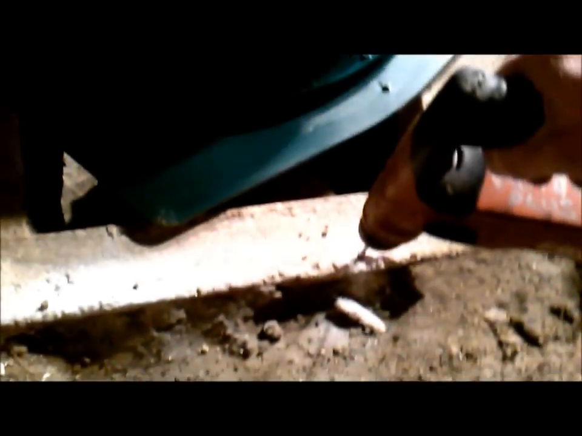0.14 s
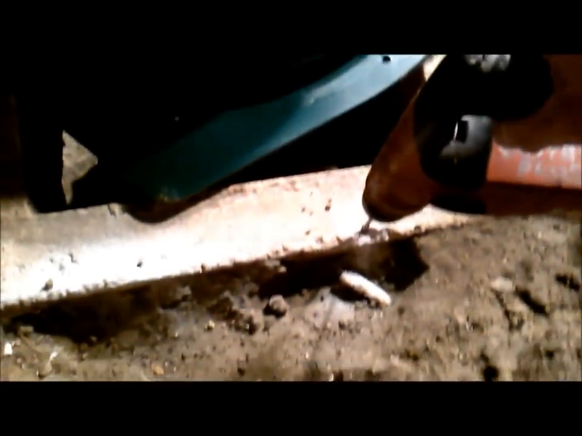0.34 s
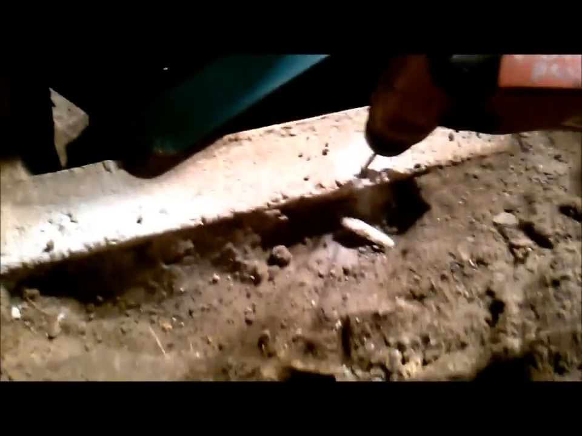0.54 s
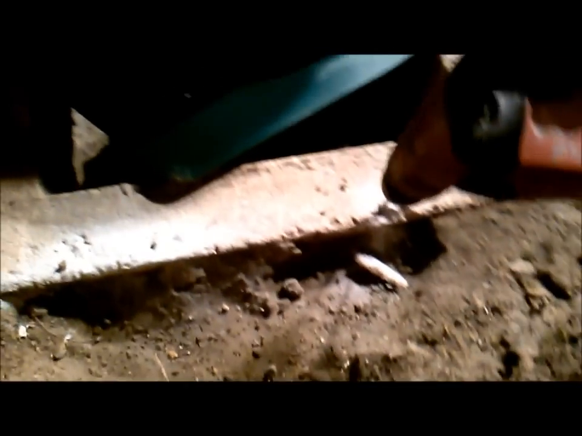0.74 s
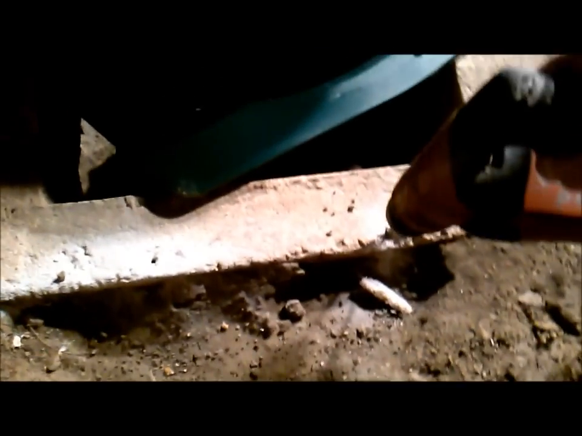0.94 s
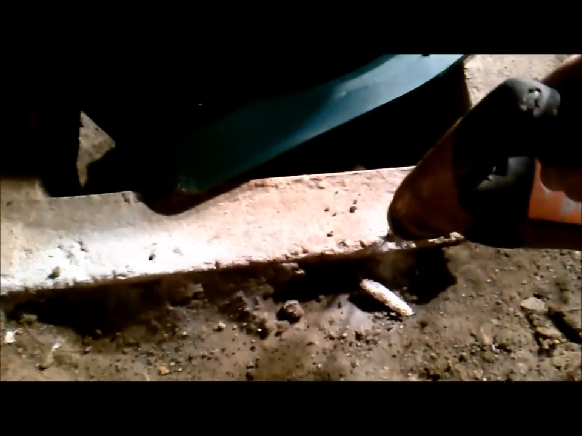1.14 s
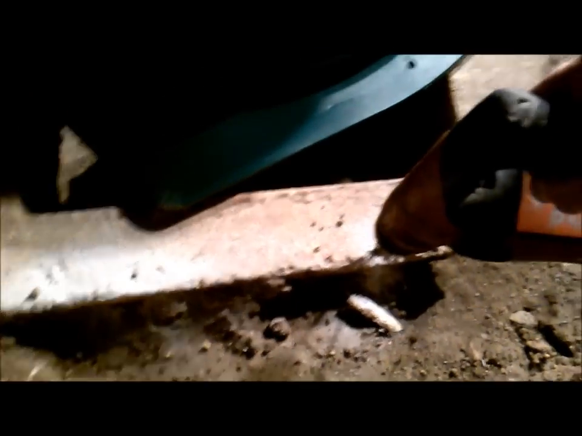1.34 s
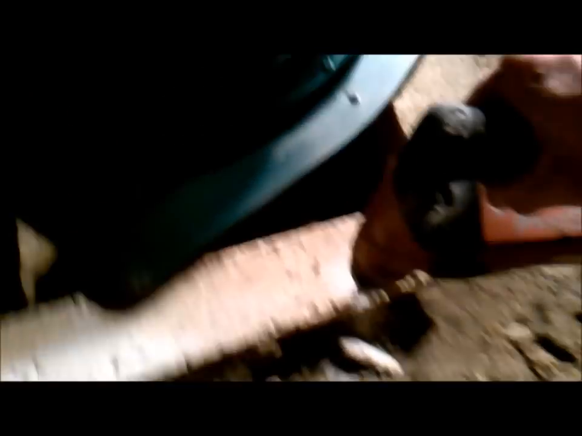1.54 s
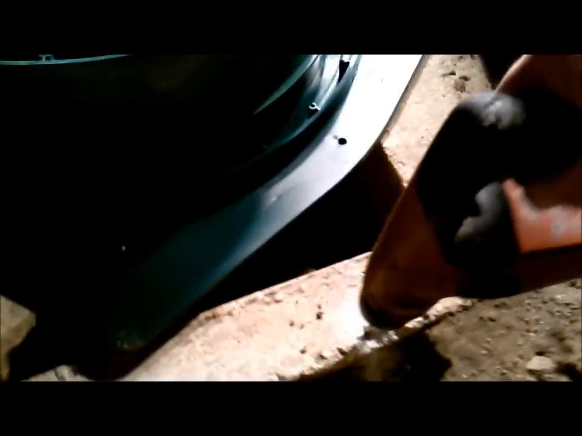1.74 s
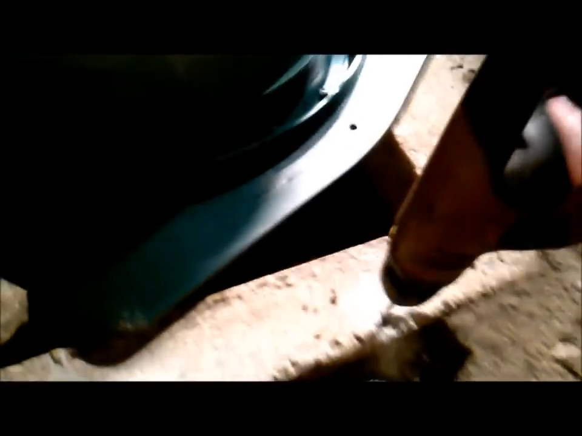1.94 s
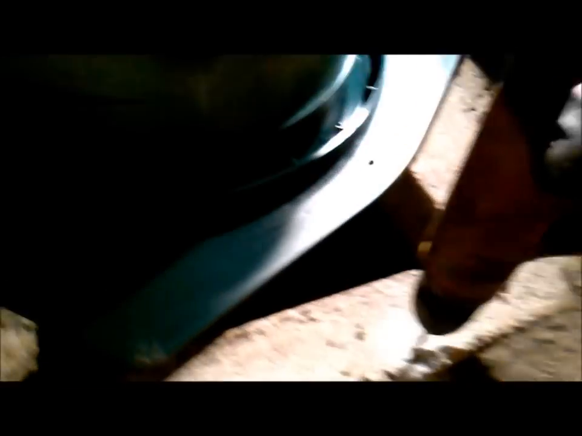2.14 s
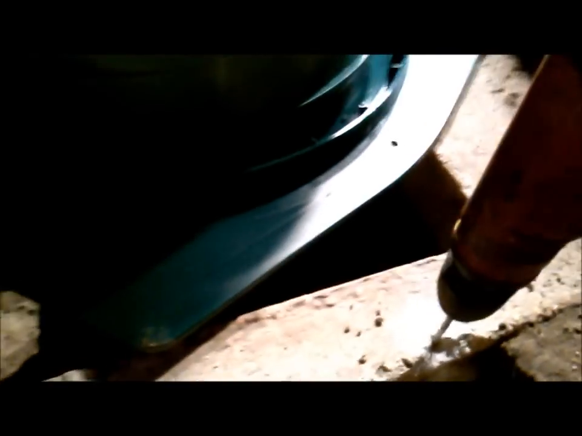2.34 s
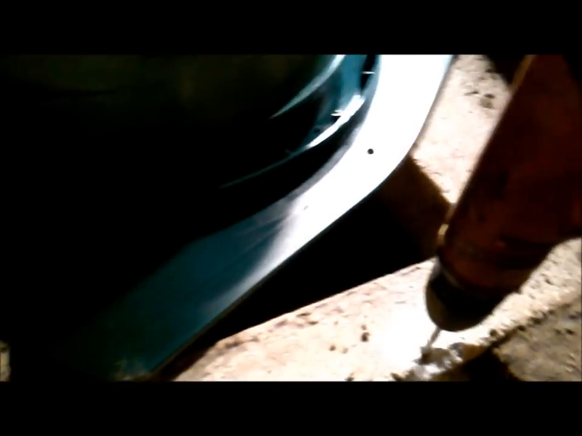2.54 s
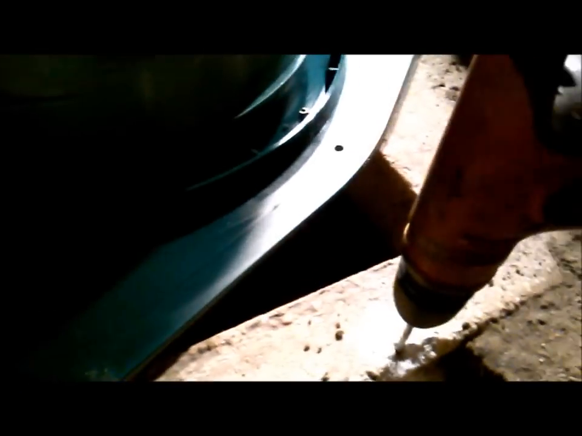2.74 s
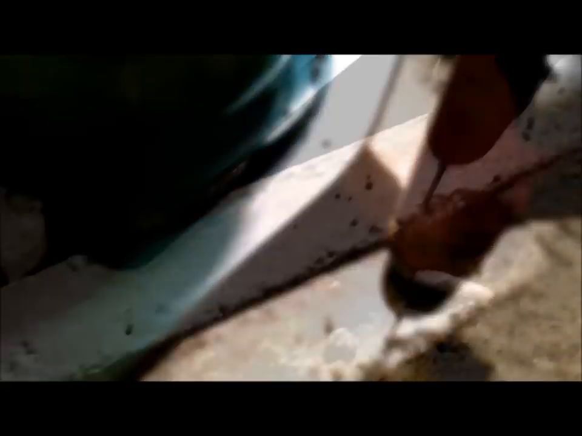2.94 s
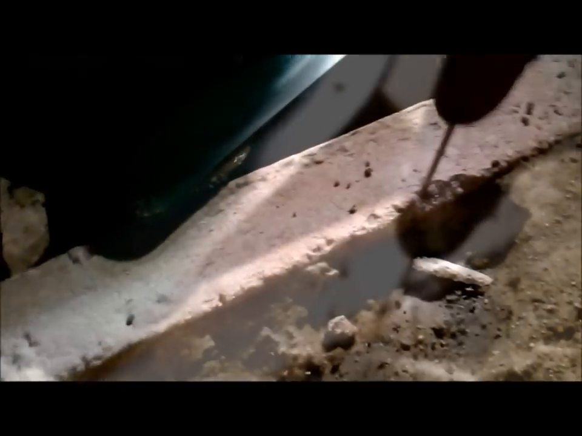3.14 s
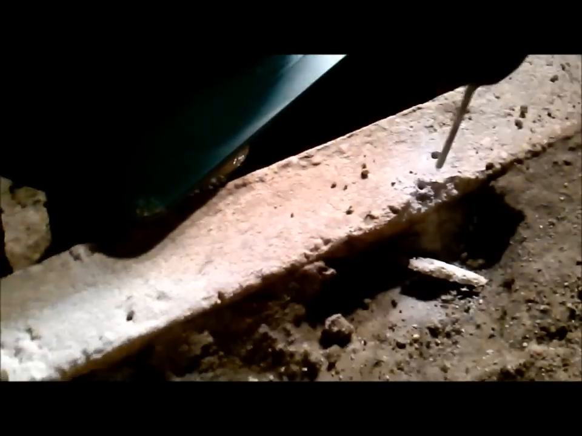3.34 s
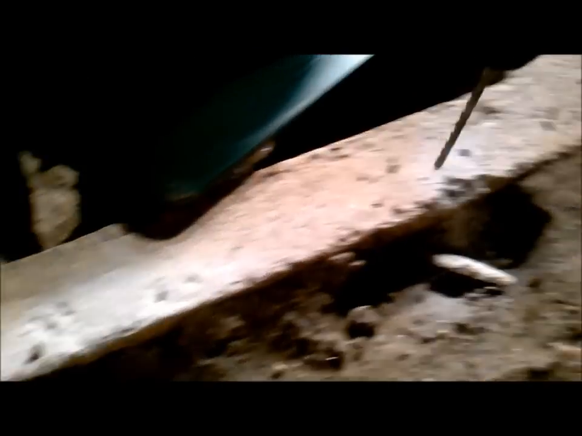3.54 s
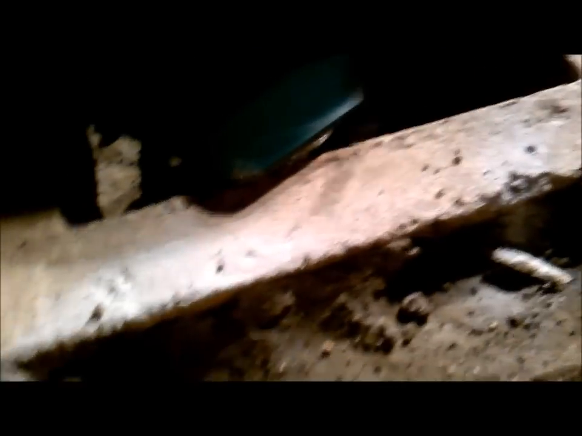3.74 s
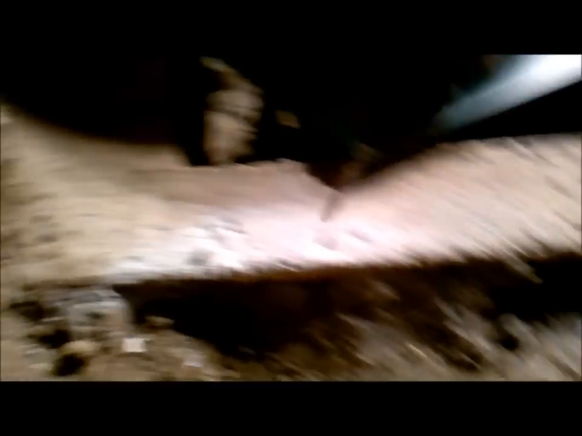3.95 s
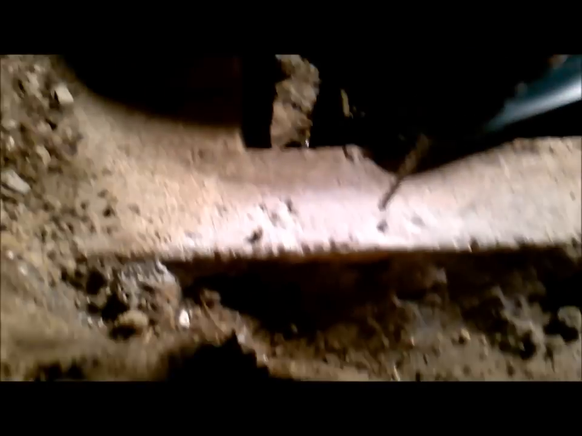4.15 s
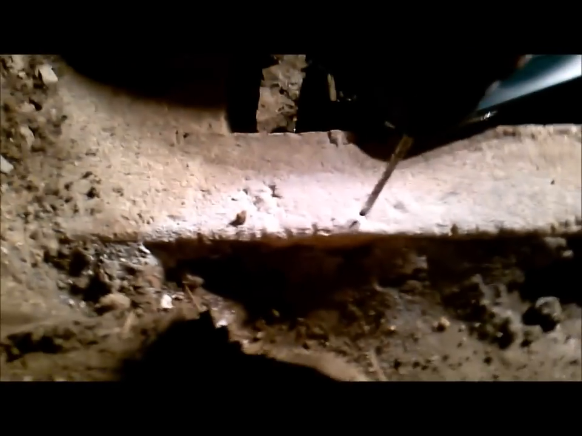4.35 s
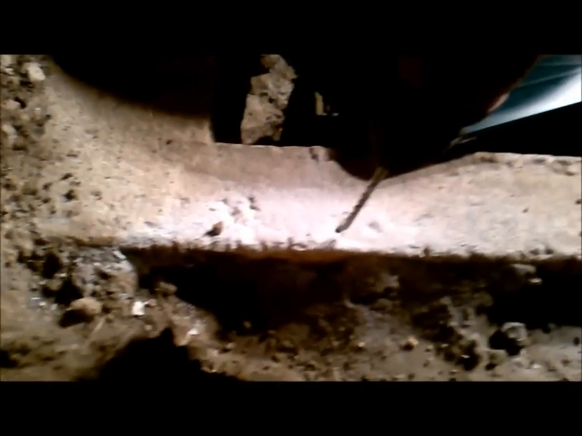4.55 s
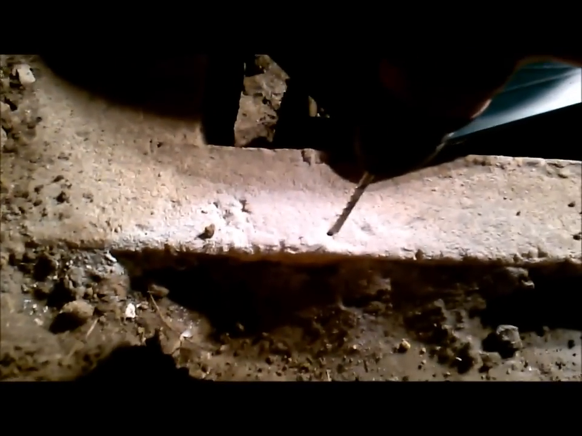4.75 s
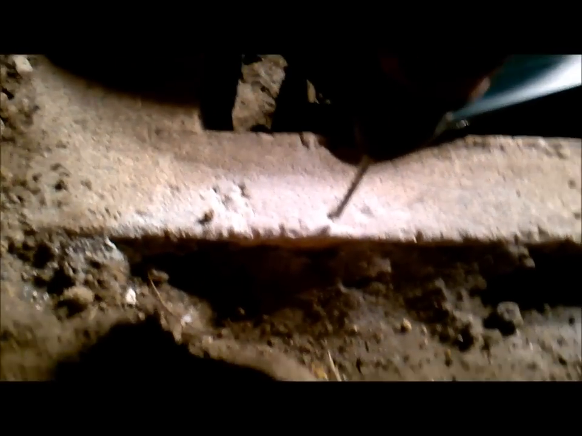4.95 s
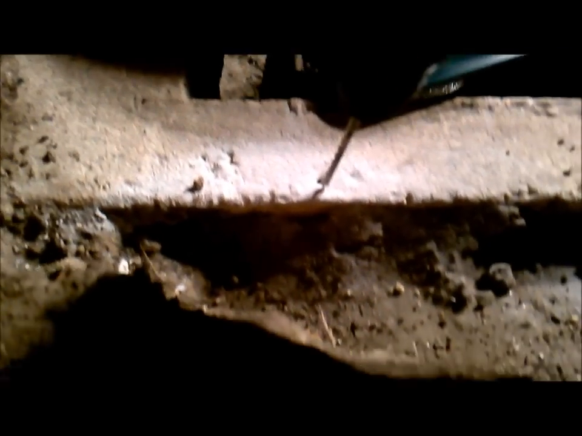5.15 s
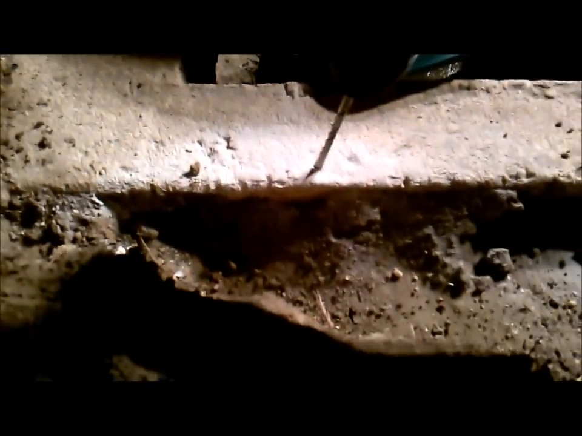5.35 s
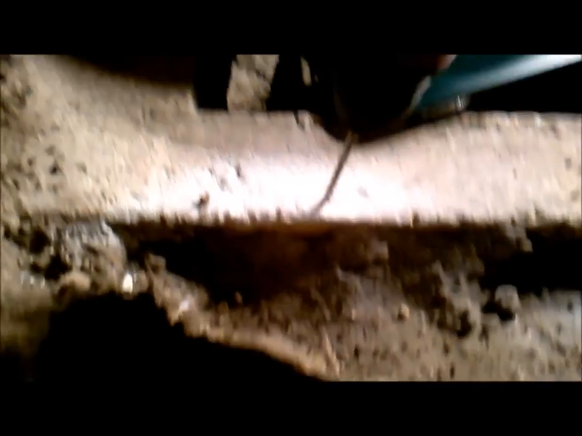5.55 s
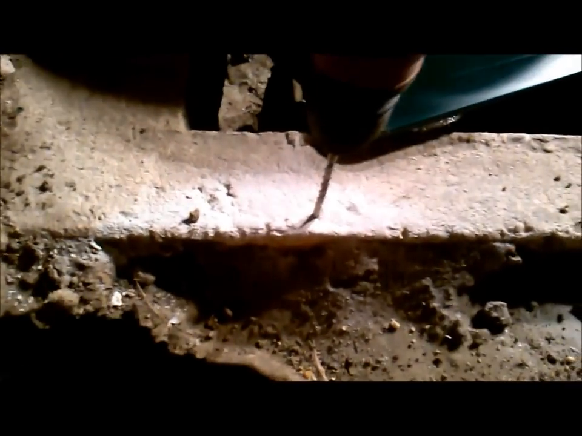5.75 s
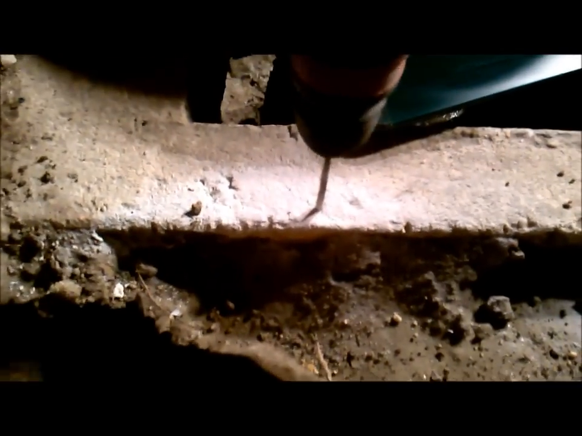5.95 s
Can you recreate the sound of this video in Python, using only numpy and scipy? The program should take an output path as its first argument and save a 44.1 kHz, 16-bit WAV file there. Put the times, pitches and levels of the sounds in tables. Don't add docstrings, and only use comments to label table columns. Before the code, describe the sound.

A rotary hammer drill works a concrete slab outdoors, very close to a mono microphone that saturates. From 0 to 0.4 s it coasts down with a falling gear whine and separate hollow knocks. It catches and spins up by about 1 s, with whine and thin squeals, then bores until 3.5 s: a dense grinding roar, knocks too fast to count, high singing gears. The sound grows brighter and hissier after 2.3 s, and around 2.85-3.35 s two stretches overlap, thicker and louder. Pulled free, it runs down from about 3.7 s, pitch dropping, knocks spreading apart with bright chuck chinks, fading by 4.8 s. Then near silence with faint low wind and slight rustle. Light taps start around 5.3 s, clearer at 5.5 s, with hard clacks at 5.7-5.8 s. At 5.8 s the motor jumps quickly to full speed, whining and roaring until the cut at about 6 s.

```python
import sys
import numpy as np
from scipy import signal
from scipy.fft import rfft, irfft
from scipy.io import wavfile
from scipy.ndimage import uniform_filter1d

SR = 44100
rng = np.random.default_rng(int(sys.argv[2]) if len(sys.argv) > 2 else 0)


def waveform_to_disk(signal):
    frames = np.transpose(np.atleast_2d(signal))
    scaled = np.clip(frames, -1, 1) * 32767
    samples = np.round(scaled).astype(np.int16)
    wavfile.write(sys.argv[1], SR, samples)


def convert_level_to_amplitude(level_db):
    exponent = np.asarray(level_db, float) / 20
    return 10 ** exponent


N = 264600
T = np.arange(N) / SR
HZ = np.fft.rfftfreq(N, 1 / SR)
STEPS = np.arange(0, N + 63, 63)


def evened(x):
    return x / np.sqrt(np.mean(x ** 2) + 1e-20)


def read(points, hz):
    f, value = np.transpose(points)
    return np.interp(np.log(hz + 1), np.log(f + 1), value)


def curves(rows, outside=None):
    s, *columns = np.transpose(rows)
    return [np.interp(T, s, c, outside, outside) for c in columns]


def add(mix, s, sound):
    part = mix[round(s * SR):][:len(sound)]
    part += sound[:len(part)]


def spell(start, end, edge=0.47):
    inside = np.minimum(T - start, end - T) / (end - start)
    return np.sin(np.pi / 2 * np.clip(inside / edge * 2, 0, 1)) ** 2


def fine(v):
    return np.interp(np.arange(N), STEPS, v)


def wander(rate_hz):
    slow = 1 + (np.fft.rfftfreq(len(STEPS), 63 / SR) / rate_hz) ** 4
    return evened(irfft(rfft(rng.standard_normal(len(STEPS))) / slow, len(STEPS)))


def band(x, lo_hz, hi_hz):
    up, down = (1 / (1 + (f / (HZ + 1)) ** 8) for f in (lo_hz, hi_hz))
    return evened(irfft(rfft(x) * np.sqrt(up * (1 - down)), N))


def patchy(patchy_db, streak_db, bands_db):
    a, b, *fields = rng.standard_normal((N // 128 + 5, 257, 5)).T
    shapes = [(8, 20), (2, 12), (3, 150)]
    field_db = 0
    for db, field, (bins, frames) in zip((patchy_db, streak_db, bands_db), fields, shapes):
        smooth = uniform_filter1d(field, size=bins, axis=0)
        field_db = field_db + db * evened(uniform_filter1d(smooth, size=frames, axis=1))
    return signal.istft((a + 1j * b) * convert_level_to_amplitude(field_db), nperseg=512, noverlap=384)[1][:N]


TEETH = 26
# time in seconds, gear mesh in Hz.
SPEED = [(0, 810), (.37, 252), (.5, 850), (.62, 1166), (.8, 1387), (1, 1459), (1.1, 1522), (1.6, 1543),
         (1.9, 1527), (2.2, 1538), (2.5, 1494), (2.8, 1475), (3.2, 1455), (3.68, 1480), (4, 960),
         (4.3, 520), (4.5, 270.2), (4.75, 60)]
# time in seconds, gear mesh in Hz.
RESPIN = [
    (5.78, 600),
    (5.83, 1036),
    (5.91, 1736),
    (6, 1667),
]


def mesh_speed():
    return curves(SPEED + RESPIN)[0]


def crank_turns():
    return np.cumsum(mesh_speed() * (1 + 0.001098 * fine(wander(24.9)))) / TEETH / SR


# time in seconds, effort in dB,
# brightness in dB.
WORK = [(0, -24, -7), (.2, -31, -6), (.372, -40, -12), (.385, -34, -9), (.5, -24.5, -4), (.62, -18, -5.5),
        (.8, -18, -3.5), (1.8, -18.5, -1.5), (2.3, -17, 2.5), (2.75, -18.5, 6), (2.9, -17, 5.5),
        (3.3, -18.5, 8.5), (3.4, -14.5, 3), (3.8, -20, 3.5), (4.1, -29, 1), (4.4, -38, 0.5),
        (4.7, -50.5, -15), (4.83, -76, -19)]
# time in seconds, effort in dB, brightness in dB.
REWORK = [
    (5.788, -30, -1),
    (5.81, -20, -6),
    (5.9, -16, -0.5),
    (6, -13, -1.5),
]
OVERLAP = (2.847, 3.346)
OVERLAP_DB = 3
SINK_S, SINK_DB = 0.11, -4


def effort():
    rest = [(5, -110, 0), (5.785, -110, 0)]
    level_db, bright_db = curves(WORK + rest + REWORK)
    sink = np.clip(1 - (OVERLAP[0] - T) / SINK_S, 0, 1) * (T < OVERLAP[0])
    return level_db + SINK_DB * sink + OVERLAP_DB * spell(*OVERLAP, .01), bright_db


# frequency in Hz, width in Hz, boost in dB.
BODY = [(1850, 324, 6), (2852, 98, 2), (3400, 110, 1.5), (4760, 1500, 2.5), (5020, 130, 1),
        (6240, 300, -0.5), (8390, 500, 0.5)]


def body_db(hz):
    return sum(db / (1 + (2 * (hz - f) / w) ** 2) for f, w, db in BODY)


# frequency in Hz, level in dB per Hz.
ROAR_COLOUR = [(59, -46), (100, -15.5), (202, -11), (245, -6), (435, -19.5), (574, -6), (1180, -11),
               (1560, -8.5), (2600, 0), (2960, -3.5), (3580, 1), (4730, 2), (8050, 4.5), (14900, -12),
               (16300, -13)]
SPLITS_HZ = [420, 1100, 3500, 6500, 10500]
# trim in dB, share of the brightness, gain in dB with the
LAYERS = [
    (-9, -0.23, 3, 0.45),
    (-2, 0.24, -1, 0),
    (-9.5, 0.16, 10.5, 0.02),
    (-4, 1, -4, 0.1),
    (-12, 0.59, 4, 0.02),
]
# start in seconds, end in seconds.
FREE = [
    (3.501, 3.95),
    (3.95, 4.36),
    (5.78, 5.9),
]
CLATTER, CLATTER_S = 0.56, 0.0051


def roar(turns):
    grains = rng.random(N) < 1500 / SR
    grit = grains * convert_level_to_amplitude(4.6 * np.minimum(rng.exponential(1, N), 3.01)) * rng.standard_normal(N)
    drive = evened(patchy(.8, 1.7, 1.4)) + .3 * evened(grit)
    drive = irfft(rfft(drive) * convert_level_to_amplitude(read(ROAR_COLOUR, HZ) + body_db(HZ)), N)
    level_db, bright_db = effort()
    free = sum(spell(*row) for row in FREE)
    edges = SPLITS_HZ + [SR]
    throb, clatter = np.cos(2 * np.pi * turns), np.ones(N)
    for s, _ in KNOCKS:
        add(clatter, s, CLATTER * np.exp(-T[:3000] / CLATTER_S))
    shake_db = level_db - 20.0 - 4.6 * (T > 2) + 9.0 * (T < .6)
    shake = convert_level_to_amplitude(shake_db) * mesh_speed() / 1500 * band(drive, 90, edges[0])
    layers = np.zeros(N)
    for k, (trim_db, share, free_db, depth) in enumerate(LAYERS):
        gain = convert_level_to_amplitude(level_db + trim_db + share * bright_db + free_db * free)
        layers += gain * (1 + depth * throb) * band(drive, edges[k], edges[k + 1])
    return shake + clatter * layers


# family number, multiple of crank
# speed, level in dB.
WHINE = [(0, 26, 0), (0, 27, -3), (0, 65, -2), (0, 104, -3), (0, 105, -8), (1, 52, 0), (1, 53, -12),
         (1, 51, -11), (1, 48, -13), (2, 78, -5), (2, 79, -2), (2, 80, 0), (2, 81, 0), (2, 82, -3),
         (2, 73.6, -3), (3, 121, -7), (3, 130, 0), (3, 131, 0), (3, 132, -5), (4, 152, 3), (4, 200, 0),
         (4, 201, -1), (4, 202, -2), (5, 65, -4), (5, 79, 0), (5, 104, -2), (5, 130, -2), (5, 152, 2),
         (5, 182, -2), (5, 208, -3), (5, 256, 0), (6, 156, 0), (6, 155, -5)]
# family number, start in seconds, end in seconds,
# level in dB.
SINGING = [(0, 0.4, 0.86, -39), (0, 0.85, 2.2, -27), (0, 2.24, 2.7, -33.5), (0, 3.75, 4.12, -28.5),
           (0, 4.2, 4.4, -43), (0, 5.79, 6.1, -35), (1, .48, 0.91, -36), (1, .56, 1.13, -25.5),
           (1, 1.1, 1.3, -27), (1, 1.55, 2.23, -21), (1, 2.015, 2.62, -21), (1, 2.55, 2.9, -27.5),
           (1, 3.76, 4.13, -23.5), (2, 0.65, 2.4, -30), (2, 3.75, 4.2, -44.5), (2, 5.79, 6.1, -27),
           (3, .55, 1.3, -39), (3, 1.15, 1.8, -27.5), (3, 5.79, 6.1, -35), (4, .5, 1.6, -51),
           (4, 2.4, 3.24, -33.5), (4, 3, 3.8, -47.5), (1, 5.815, 5.89, -16.5), (5, 3.78, 4.15, -32),
           (5, 4.05, 4.35, -39), (5, 4.28, 4.5, -45), (4, 3.7, 4.3, -42), (6, 0.6, 1.2, -30),
           (1, 4.1, 4.36, -36), (2, 0.94, 1.12, -39), (2, 1.532, 2.05, -37)]
FAINT_DB = [-28, -24.5, -25, -25, -33, -44, -45]


def whine(turns):
    at, level_db = np.minimum(STEPS, N - 1), effort()[0]
    mesh_hz = mesh_speed()[at]
    gains = []
    for k, db in enumerate(FAINT_DB):
        singing = sum(convert_level_to_amplitude(row[3]) * spell(*row[1:3]) for row in SINGING if round(row[0]) == k)
        gains.append((convert_level_to_amplitude(level_db + db) + singing)[at])
    slack = np.clip(np.where(T[at] > 1.1, 4.2 - mesh_hz / 400, .2), .12, .62)
    lines = np.zeros(N)
    for k, order, db in WHINE:
        waver_db = 1.4 * wander(8) + 4 * slack * wander(45)
        level = gains[k] * convert_level_to_amplitude(db + waver_db + body_db(order * mesh_hz / TEETH))
        phase = order * turns + fine(.24 * slack * wander(150)) + rng.random()
        lines += fine(level) * np.sin(2 * np.pi * phase)
    return (1 + 0.29 * fine(slack) * np.cos(2 * np.pi * turns)) * lines


# frequency in Hz, level in dB, decay by 60 dB in seconds.
HOUSING = [(530.3, -3.5, 0.037), (566.7, 6.5, 0.024), (848.4, -3.5, 0.054), (930, 3, 0.014),
           (1357, -6.5, 0.04), (2104, 3, 0.026), (2600, -5.5, 0.014), (8260, 4.5, 0.013)]


def knock(bright_db, chance, rise=0.003895, load=1):
    t = np.arange(2600) / SR
    ring = np.zeros(len(t))
    for k, ((hz, db, t60), u) in enumerate(zip(HOUSING, chance)):
        upper = k > 1
        decay_db = 60 * (t * load ** 3 / t60) ** 1.7
        phase = 2 * np.pi * (hz * load * (1 + 0.041 * u) * t + 3 * u * upper)
        ring += convert_level_to_amplitude(db + bright_db * upper - decay_db) * np.sin(phase)
    ring = ring * (1 - np.exp(-(t / rise) ** 2.4))
    return ring / abs(ring).max()


# time in seconds, peak in dB.
KNOCKS = [(.051, -14), (.089, -15.5), (.136, -16.5), (.188, -22), (.238, -38), (.383, -25), (.431, -15),
          (.48, -14.5), (.515, -18), (.545, -14), (3.918, -9.5), (3.943, -7.5), (3.969, -13.5),
          (3.994, -11.5), (4.018, -14), (4.05, -11.5), (4.083, -6), (4.116, -8), (4.148, -10),
          (4.184, -10.5), (4.226, -10), (4.269, -10), (4.318, -14), (4.328, -20), (4.376, -15),
          (4.385, -22), (4.445, -17), (4.538, -21), (4.6, -38), (4.695, -35.5)]
# delay in seconds, level in dB.
REBOUNDS = [
    (0, 0),
    (.0069, -6),
    (.026, -12),
]
# start in seconds, end in seconds, peak in dB,
# crank thump in dB, load as a factor on the ring's pitch.
BLOWS = [
    (0.605, 1.487, -15, -36.5, 1.036),
    (1.352, 2.15, -14, -36, 1.147),
    (2.09, 2.845, -21.5, -46, 1.02),
    (2.8, 3.449, -28.5, -42.5, 0.83),
    (3.715, 3.915, -13.5, -57, 1.01),
    (5.805, 6.1, -18, -53.5, 1.01),
]
RISING_DB, COASTING_DB = -0.5, -10
EVEN = .55


def hammer(turns):
    out = np.zeros(N)
    at = np.flatnonzero(np.diff(np.floor(turns)))
    chance = rng.standard_normal((400, len(HOUSING) + 1))
    for start, end, db, _, load in BLOWS:
        strength = convert_level_to_amplitude(db) * spell(start, end, 0.11)
        for i, u in zip(at, chance):
            if strength[i] > 0:
                add(out, i / SR, strength[i] * convert_level_to_amplitude(1.3 * u[-1]) * knock(-8, u, .003, load))
    for (s, db), u in zip(KNOCKS, rng.standard_normal((len(KNOCKS), len(HOUSING)))):
        bright_db = RISING_DB if s < 1 else COASTING_DB
        blow = knock(bright_db, EVEN * u, .0045 if 1 < s < 4.35 else .0025, 1.02)
        lead_s = .003 * (1 if 1 < s < 4.2 else .5)
        for delay, rebound_db in REBOUNDS:
            add(out, s - lead_s + delay, convert_level_to_amplitude(db + rebound_db) * blow)
    out = signal.sosfilt(signal.butter(4, 370, "high", fs=SR, output="sos"), out)
    piston = np.sin(2 * np.pi * turns) + 0.24 * np.sin(4 * np.pi * turns)
    thump = sum(convert_level_to_amplitude(row[3]) * spell(*row[:2]) for row in BLOWS)
    return out + thump * convert_level_to_amplitude(1.5 * fine(wander(8)) + 2.5) * piston


# time in seconds, peak in dB, housing knock in dB, ring in Hz,
# tilt in dB per octave.
TAPS = [(.052, -13, -45, 2500, 6), (.137, -17, -42, 2540, 0.1), (0.3116, -21, -48, 1900, 0),
        (.381, -16, -33, 3140, 8), (.44, -27, -36, 1790, 0.5), (4.497, -19, -42, 2720, 0),
        (5.2964, -63, -61, 2280, .1), (5.3254, -53, -53, 2230, -3), (5.4355, -48.5, -59, 7900, 4),
        (5.466, -39, -44.5, 3400, 1), (5.505, -41, -49, 2300, 10), (5.5195, -15.5, -21, 2310, -0.5),
        (5.563, -46, -62, 3490, 1.5), (5.579, -48, -62, 7000, 4), (5.596, -20, -39, 1980, -5.5),
        (5.671, -27, -35, 1300, 2), (5.706, -3.5, -19.5, 3450, 2), (5.719, -32, -45, 6930, 1),
        (5.726, -38, -45, 8450, 0), (5.7395, -14.5, -34, 1992, -3), (5.7677, -13, -26, 1562, 5),
        (5.7741, -1, -20, 1980, 3), (5.7907, 0, -24, 4910, -5)]
# frequency in Hz, level in dB per Hz.
TAP_COLOUR = [(530, -36), (900, 0), (1680, -4), (2270, -1), (2930, -2.5), (4360, 1), (13700, -18),
              (16000, -44)]
HARD_T60_S, SOFT_T60_S = .012, .023


def taps():
    out, t = np.zeros(N), np.arange(4096) / SR
    bins = np.fft.rfftfreq(len(t), 1 / SR)
    for (s, db, knock_db, hz, tilt_db), noise in zip(TAPS, rng.standard_normal((len(TAPS), len(t)))):
        colour = convert_level_to_amplitude(read(TAP_COLOUR, bins) + tilt_db * np.log2(bins / 3000 + .1))
        grit = evened(irfft(rfft(noise) * colour))
        decay = convert_level_to_amplitude(-60 * t / (HARD_T60_S if db > -12 else SOFT_T60_S))
        tail = grit * convert_level_to_amplitude(-27.0 - 60 * t / 0.18)
        burst = (grit + 0.96 * np.sin(2 * np.pi * hz * t)) * decay + tail
        add(out, s, convert_level_to_amplitude(db - 7.5) * burst * (1 - np.exp(-t / 0.001)))
        add(out, s, convert_level_to_amplitude(knock_db + 3) * knock(-13, EVEN * noise, .002, 1.05))
    return signal.sosfilt(signal.butter(4, 430, "high", fs=SR, output="sos"), out)


# start in seconds, length in seconds, start in Hz,
# end in Hz, level in dB.
SQUEALS = [
    (.193, .022, 9450, 8900, -26),
    (.48, .14, 3450, 3500, -24),
    (.57, .15, 3500, 3560, -18),
    (.64, .16, 4950, 5060, -25),
    (.55, .2, 8500, 8750, -27),
    (1.88, .5, 6230, 5950, -20),
    (2.84, .35, 2350, 2450, -25),
    (2.86, .25, 6700, 7000, -21),
    (3.5, .25, 5600, 5100, -23),
    (5.81, .05, 5000, 4950, -21),
]
FUZZ_HZ = 60


def squeals():
    out = np.zeros(N)
    for s, length, start_hz, end_hz, db in SQUEALS:
        glide = np.linspace(0, 1, round(length * SR))
        flutter = 1.7
        if length > .035:
            chance = fine(1 + wander(FUZZ_HZ) + 1j * wander(FUZZ_HZ))[:len(glide)]
            flutter = 1.1 + .8 * chance
        tone = np.exp(2j * np.pi * np.cumsum(start_hz + (end_hz - start_hz) * glide) / SR)
        add(out, s, convert_level_to_amplitude(db) * 0.5 * np.sin(np.pi * glide) * (flutter * tone).real)
    return out


# frequency in Hz, width in Hz, level in dB.
LOOSE = [(1335, 40, -9), (1745, 45, 1.5), (2070, 55, -1.5), (2240, 45, -1), (2690, 45, -5.5),
         (3595, 80, -4), (5120, 200, 4), (6270, 150, -3), (8300, 500, -1)]
# start in seconds, end in seconds, level in dB relative to the effort.
COASTS = [
    (-.3, .4, -10),
    (3.95, 4.85, -4.5),
]
# time in seconds, peak in dB, frequency in Hz.
CHINKS = [(4.085, -22, 8600), (4.114, -13, 8600), (4.146, -7, 8100), (4.19, -16, 8000), (4.23, -20, 8000),
          (4.273, -29, 8600), (4.2947, -25, 7230), (4.32, -23, 11500), (4.3755, -14, 8200),
          (4.4134, -21, 7400), (4.4448, -23, 8160), (4.4977, -25, 7390), (4.5361, -28, 8180),
          (4.59, -40, 8200), (4.612, -41, 8200), (4.6309, -41, 8300), (4.652, -49, 8200),
          (4.6803, -50, 8340), (4.715, -52, 8200), (4.7616, -57, 8270)]
CHINK_T60_S, CHINK_WIDTH_HZ = 0.058, 1700


def loose():
    peaks = sum(convert_level_to_amplitude(db) / (1 + (2 * (HZ - f) / w) ** 2) for f, w, db in LOOSE)
    hum = evened(irfft(rfft(rng.standard_normal(N)) * peaks, N))
    out = convert_level_to_amplitude(effort()[0]) * sum(convert_level_to_amplitude(db) * spell(start, end) for start, end, db in COASTS) * hum
    t = np.arange(3000) / SR
    bins = np.fft.rfftfreq(len(t), 1 / SR)
    for (s, db, hz), noise in zip(CHINKS, rng.standard_normal((len(CHINKS), len(t)))):
        ring = evened(irfft(rfft(noise) / (1 + (2 * (bins - hz) / CHINK_WIDTH_HZ) ** 2)))
        add(out, s, convert_level_to_amplitude(db - 7.5 - 60 * t / CHINK_T60_S) * (1 - np.exp(-t / .0011)) * ring)
    return out


# frequency in Hz, level in dB per Hz.
AIR = [(12, -32.5), (20, -7.5), (48, -9.5), (81, -8.5), (134, -14.5), (146, -24.5), (182, -24.5),
       (204, -32.5), (3740, -55), (14300, -60.5), (16000, -64.5)]
# start in seconds, end in seconds, level in dB.
GUSTS = [
    (-.1, .12, -46.5),
    (4.45, 4.9, -56),
    (4.89, 4.915, -52),
    (.28, 0.462, -44),
    (5.077, 5.169, -45),
    (5.424, 5.5, -50),
    (5.77, 5.88, -32),
]
# time in seconds, rustle in dB.
HANDLING = [
    (4.55, -59),
    (4.75, -72),
    (5.05, -66),
    (5.25, -68.5),
    (5.35, -64),
    (5.6, -64),
    (5.75, -49),
]
# frequency in Hz, level in dB.
ELECTRONICS = [(4000, -91), (8000, -88.5), (9000, -92), (10000, -88)]
BREEZE_DB, LUMPS_DB, SHAKEN_DB, SCUFF_DB = -56, 4, -47, -6.5


def air():
    noise = irfft(rfft(patchy(1.77, 1.3, 2.3)) * convert_level_to_amplitude(read(AIR, HZ)), N)
    rustle_db, = curves(HANDLING)
    breeze = convert_level_to_amplitude(BREEZE_DB + LUMPS_DB * fine(wander(12)))
    shaken = convert_level_to_amplitude(SHAKEN_DB) * np.clip(1 + (effort()[0] + 22) / 20, 0, 1)
    gusts = sum(convert_level_to_amplitude(db) * spell(start, end, 0.93) for start, end, db in GUSTS)
    wind = (breeze + shaken + gusts) * band(noise, 14, 200)
    rustle = convert_level_to_amplitude(rustle_db) * band(noise, 200, 920)
    scuff = convert_level_to_amplitude(rustle_db + SCUFF_DB) * band(noise, 1800, SR)
    whistle = sum(convert_level_to_amplitude(db) * np.sin(2 * np.pi * hz * T) for hz, db in ELECTRONICS)
    return wind + rustle + scuff + whistle


def scene():
    turns = crank_turns()
    mono = whine(turns) + roar(turns) + hammer(turns) + taps() + squeals() + air() + loose()
    return np.array([mono, mono])


# frequency in Hz, share of patches left empty from 0 to 1.
STARVED = [(10000, 0.03), (12500, 0), (14000, .14), (15000, 0.2), (15800, .55)]


def starve(x):
    hz, t, z = signal.stft(x, SR, nperseg=1024)
    chance = rng.random((len(hz) // 6 + 1, len(t) // 3 + 1))
    patch = chance.repeat(6, axis=0).repeat(3, axis=1)[:len(hz), :len(t)]
    share = read(STARVED, hz)[:, None] * (hz[:, None] > STARVED[0][0])
    share = share * np.where((t > OVERLAP[0]) & (t < 3.85), .12, 1)
    return signal.istft(z * (patch > share), SR, nperseg=1024)[1][:, :N]


def fills(mid):
    side, hz = np.zeros(N), np.fft.rfftfreq(2048, 1 / SR)
    for when, where in rng.random((17, 2)):
        s, lo_hz = 1 + 2.5 * np.sqrt(when), 4200 + 9000 * where ** 2
        z = rfft(mid[round(s * SR) - 1024:][:2048]) * (hz > lo_hz) * (hz < lo_hz + 1800)
        shuffled = irfft(z * np.exp(2j * np.pi * rng.random(len(hz))))
        add(side, s - 1024 / SR, shuffled * signal.windows.tukey(2048, .7))
    return convert_level_to_amplitude(-6.0) * side * [[1], [-1]]


def low_pass(x):
    return signal.sosfilt(signal.butter(12, 16420, fs=SR, output="sos"), x)


CEILING_ONE, CEILING_TWO = 0.45, 0.59


def record(dry):
    ceiling = CEILING_ONE + (CEILING_TWO - CEILING_ONE) * spell(*OVERLAP, .01)
    knee = 3.8
    bent = dry / (1 + abs(dry / ceiling) ** knee) ** (1 / knee)
    lowpass = signal.firwin(767, 15700, window=("kaiser", 9), fs=SR)
    bent = signal.oaconvolve(bent, lowpass[None], "same")
    mix = np.clip(starve(bent) + fills(bent[0]), -1, 1)
    return low_pass(mix)


dry = scene()
out = record(dry)
waveform_to_disk(out)
```